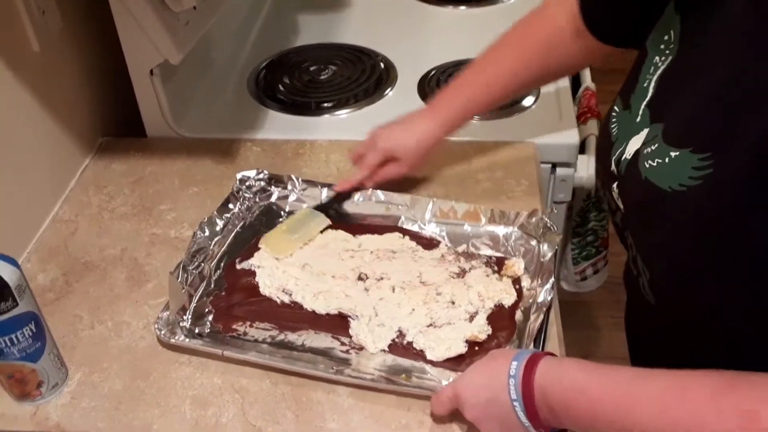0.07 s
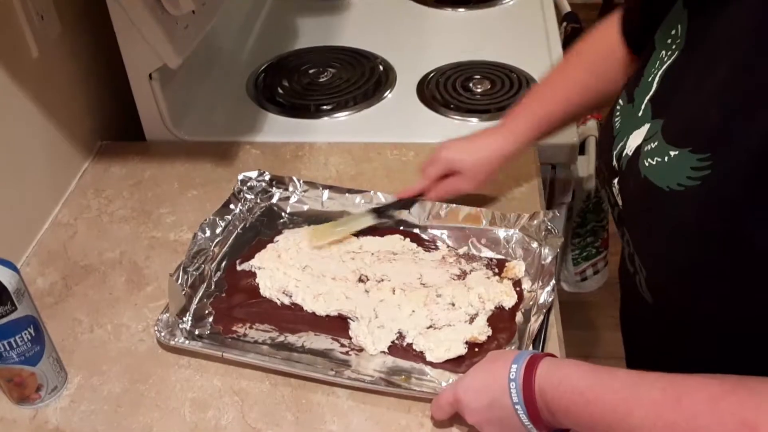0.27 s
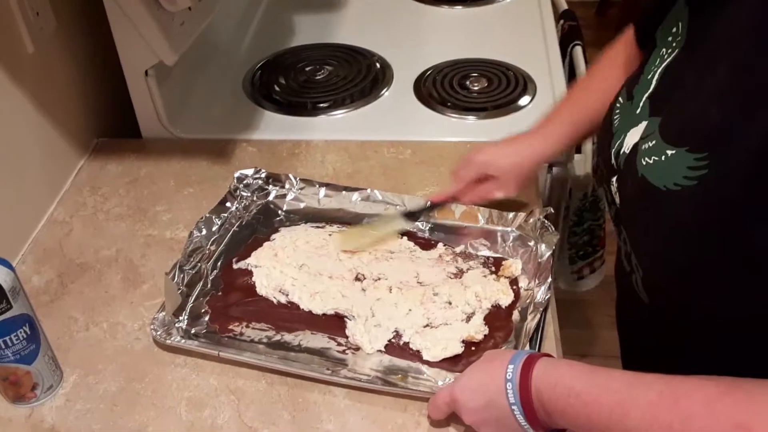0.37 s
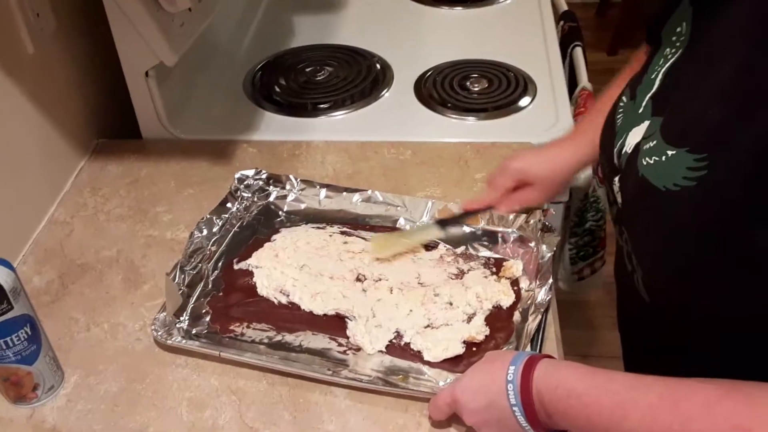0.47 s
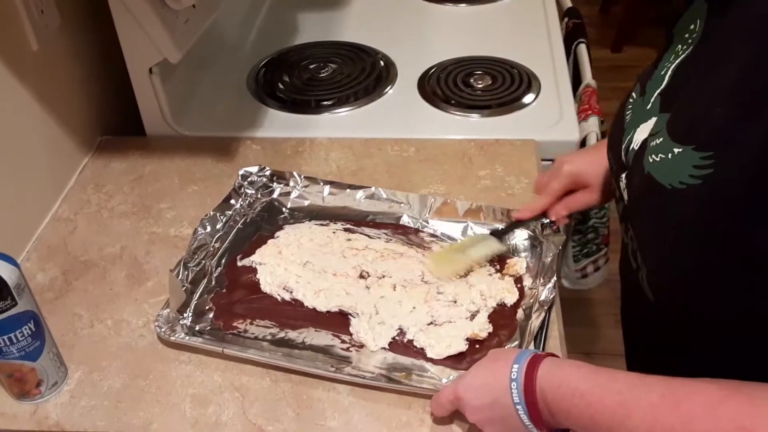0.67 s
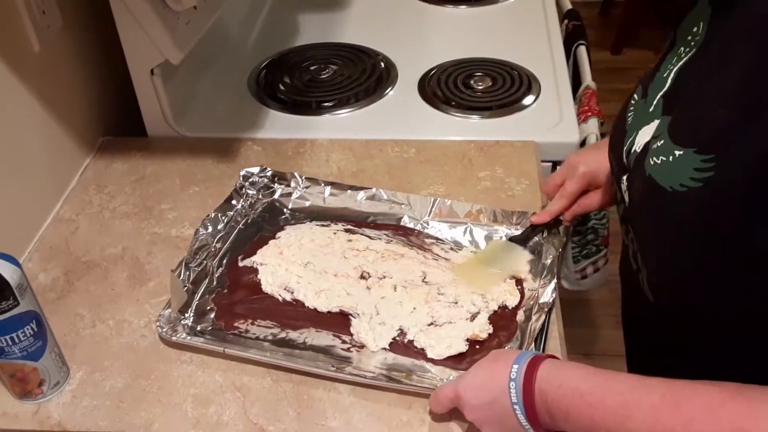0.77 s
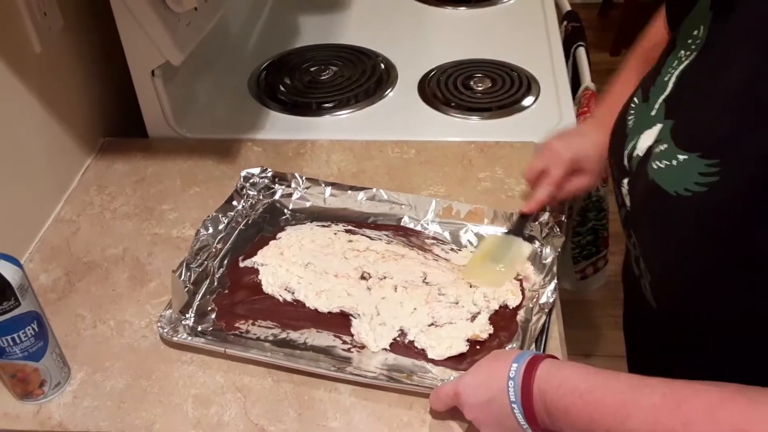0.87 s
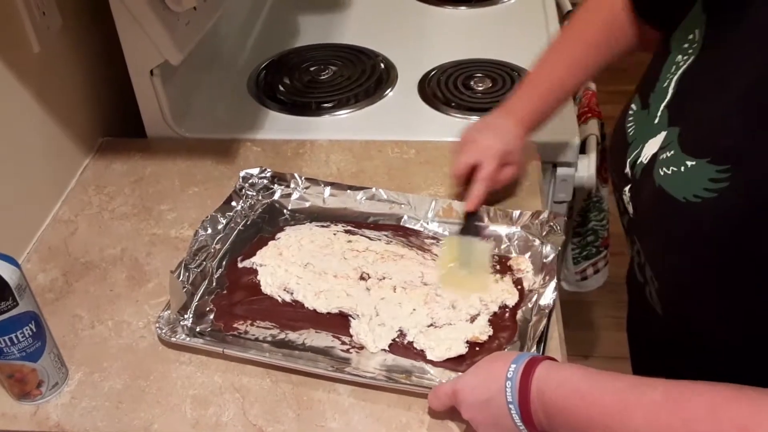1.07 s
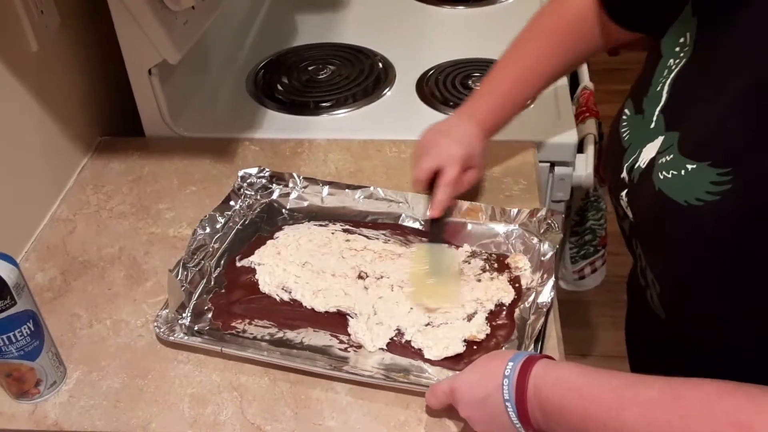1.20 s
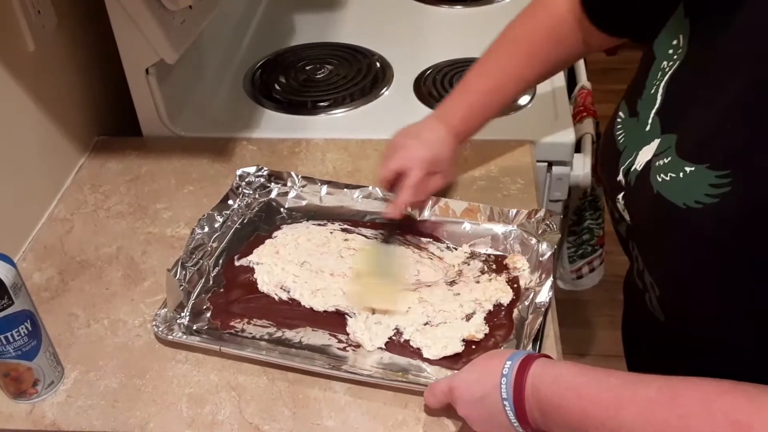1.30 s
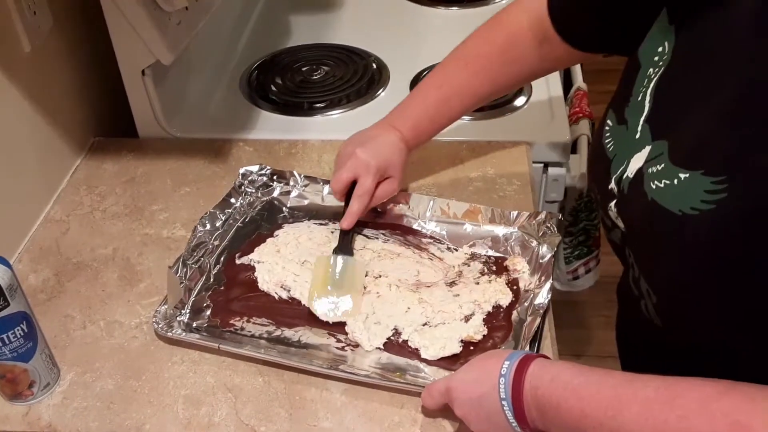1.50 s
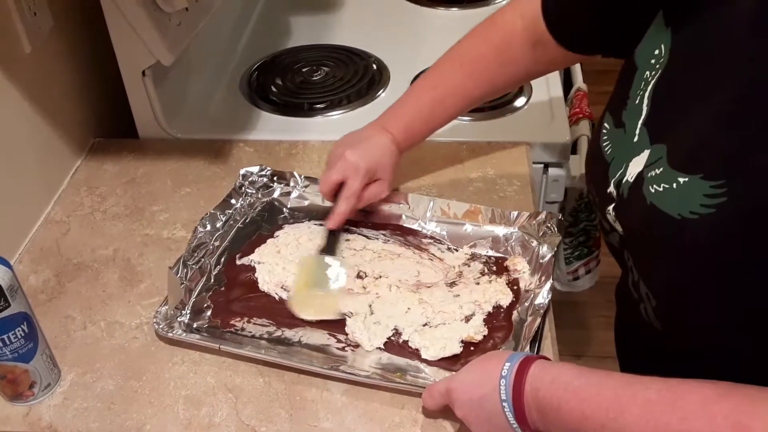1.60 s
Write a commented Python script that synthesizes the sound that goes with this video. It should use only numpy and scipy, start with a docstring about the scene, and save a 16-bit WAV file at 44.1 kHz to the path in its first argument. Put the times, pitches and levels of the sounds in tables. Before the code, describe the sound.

Thin foil crinkles and rustles in quick bursts as a spatula scrapes across a baking sheet

```python
"""A spatula drags a rustle of tiny creases out of foil as it spreads melted chocolate over a baking sheet.
The rustle is trains of random clicks, filtered into bands with ringing facets; folds buckle in bursts.
The blade also knocks the sheet, and each knock is a short noise that rings the sheet's modes.
Filtered noise and faint hums make the sheet rumble on the counter under the stroke.
A short kitchen reverberation follows foil and knocks; shaped noise gives steady hiss and room air."""
import sys
import numpy as np
from scipy import signal
from scipy.io import wavfile

SR = 44100
rng = np.random.default_rng(int(sys.argv[2]) if len(sys.argv) > 2 else 0)


def int16_out(signal):
    """Quantize to a 16-bit WAV file."""
    q = np.round(np.clip(np.atleast_2d(signal).T, -1, 1) * 32767)
    wavfile.write(sys.argv[1], SR, q.astype(np.int16))


def amplitude_ratio(level_db):
    """Convert a level in decibels to the matching linear amplitude (field) ratio."""
    exponent = np.asarray(level_db, float) / 20
    return 10 ** exponent


N = 72765  # length in samples

EDGES = 26.8 * 2 ** np.arange(0, 9.5, 1 / 3)  # third-octave band edges in Hz
FLICKER_PER_S = 17.5  # rate of the rustle's and the facets' level drifts


def rms_one(x):
    """Scale to rms 1."""
    return x / np.sqrt(np.mean(x ** 2) + 1e-20)


def in_time(rows):
    """Interpolate the columns of a time curve at every sample."""
    seconds, *columns = np.transpose(rows)
    return [np.interp(np.arange(N) / SR, seconds, column) for column in columns]


def at_hz(points, hz):
    """Read a spectrum on a logarithmic frequency axis."""
    points = np.array(points)
    return np.interp(np.log(hz), np.log(points[:, 0]), points[:, 1])


def drift(rate):
    """Slow random wander of rms 1: noise through a two-pole low-pass at the given rate per second."""
    # computed at every 40th sample; the first 500 values let the filter settle
    pole = np.exp(-80 * np.pi * rate / SR)
    noise = rng.standard_normal(N // 40 + 502)
    slow = signal.lfilter([1], [1, -2 * pole, pole * pole], noise)[500:]
    return np.interp(np.arange(N) / 40, np.arange(len(slow)), rms_one(slow))


def band(x, low, high):
    """Band-pass between two frequencies in Hz."""
    return signal.sosfilt(signal.butter(2, [low, high], "band", fs=SR, output="sos"), x)


def spread(mid, side, alike, left_db):
    """Mix mid and side into two channels of given likeness and left-minus-right balance in dB."""
    alike = np.clip(alike, -.9, .99)
    pair = np.sqrt(1 + alike) * mid + np.sqrt(1 - alike) * side * np.array([[1], [-1]])
    return pair * amplitude_ratio(np.array([[.5], [-.5]]) * left_db)


def air():
    """Steady hiss and room air: white noise shaped in third-octave bands."""
    # Colour of the air. Each row: frequency in Hz, relative level in dB per Hz.
    air_colour = [(25, -30), (70, -11), (1000, -10), (1900, -4), (3700, -7), (6000, -8), (7700, -3),
                  (9700, -6), (12200, 1.5), (15400, -4)]
    # How alike the channels are. Each row: frequency in Hz, likeness (1 is identical).
    air_likeness = [(60, .65), (300, .5), (1400, .15), (4000, 0)]
    # Stereo tilt. Each row: frequency in Hz, left minus right in dB.
    air_balance = [(60, 6), (500, 2), (5000, 3)]
    air_db = -48.5  # rms of the channel mean

    white, out = rng.standard_normal((2, 2, N)), 0
    for k, (low, high) in enumerate(zip(EDGES, EDGES[1:])):
        hz = np.sqrt(low * high)
        # neighbouring bands use different noise
        mid, side = band(white[k % 2], low, high)
        pair = spread(mid, side, at_hz(air_likeness, hz), at_hz(air_balance, hz))
        out = out + amplitude_ratio(at_hz(air_colour, hz)) * pair
    return amplitude_ratio(air_db) * out / np.std(out.mean(axis=0))


def kitchen(x):
    """Reverberation: convolution with a dull, dying noise response for each channel."""
    t60_s, wall_cut_hz = 0.15, 8100
    t = np.arange(SR // 2) / SR
    # no reflection in the first 6 ms
    tail = rng.standard_normal((2, len(t))) * amplitude_ratio(-60 * t / t60_s) * (t > .006)
    tail = signal.sosfilt(signal.butter(1, wall_cut_hz, fs=SR, output="sos"), tail)
    return signal.fftconvolve(x, tail / np.sqrt(np.sum(tail ** 2) / 2), axes=1)[:, :N]


def sheet_rumble():
    """Rubbing noise in two low resonances of the sheet on the counter, with faint wavering hums."""
    # Stroke of the rumble. Each row: time in seconds, relative level below 150 Hz in dB, level above in dB.
    rumble_levels = [(0, -61.5, -66), (.2, -56.5, -61), (.4, -64, -62.5), (.9, -64.5, -61),
                     (1.05, -72, -64), (1.15, -69, -54), (1.19, -77, -69), (1.65, -71.5, -78)]
    # Resonances. Each row: frequency in Hz, width in Hz, relative level in dB, rumble column to follow.
    resonances = [(117, 46, -9, 0), (159, 170, -7, 1)]
    # Hums. Each row: frequency in Hz, waver in Hz, relative level in dB, rumble column to follow.
    hums = [(77, 4, -1, 0), (247, 6, -1, 1)]
    # Left minus right in dB, one value for each rumble column.
    rumble_left_db = (6.5, 2.2)
    likeness, wavers_per_s = .7, 8

    levels, out = in_time(rumble_levels), 0
    for hz, width_hz, level_db, column in resonances:
        k = int(round(column))
        pole = np.exp(-np.pi * width_hz / SR)
        feedback = [1, -2 * pole * np.cos(2 * np.pi * hz / SR), pole * pole]
        mid, side = signal.lfilter([1, 0, -1], feedback, rng.standard_normal((2, N)))
        pair = spread(rms_one(mid), rms_one(side), likeness, rumble_left_db[k])
        out = out + amplitude_ratio(levels[k] + level_db) * pair
    for hz, waver_hz, level_db, column in hums:
        k = int(round(column))
        turns = np.cumsum(hz + waver_hz * drift(wavers_per_s)) / SR
        pair = spread(np.sin(2 * np.pi * turns), 0, 0, rumble_left_db[k])
        out = out + amplitude_ratio(levels[k] + level_db) * pair
    return band(out, 45, 400)


def knocks():
    """The blade knocks the sheet: a short rattling contact rings the modes near its best-excited pitch."""
    # Each row: start in seconds, relative level in dB, best-excited pitch in Hz, t60 of the contact in seconds.
    blade_knocks = [(0.0517, -28, 2350, .005), (.069, -37, 3800, .05), (0.4806, -39, 2100, .025),
                    (0.5388, -36, 1950, .012), (1.215, -33, 1150, .04), (1.581, -32, 2600, .05)]
    # Modes of the sheet. Each row: frequency in Hz, relative level in dB, t60 in seconds.
    sheet_modes = [(1310, 3, .03), (1690, 2, .02), (1845, 1, .04), (2180, 0, .016), (2490, 0, .02),
                   (2660, -1, .035), (3050, -1, .02), (3280, -13, .14), (3480, -10, .15), (3700, 4, .018)]
    reach_octaves = .5  # spread of the excited modes around the best pitch

    out, t = np.zeros((2, N)), np.arange(SR // 4) / SR
    for start_s, level_db, centre_hz, contact_s in blade_knocks:
        ring = 0
        for hz, mode_db, t60 in sheet_modes:
            excited = np.exp(-.5 * (np.log2(hz / centre_hz) / reach_octaves) ** 2)
            ring = ring + excited * amplitude_ratio(mode_db - 60 * t / t60) * np.sin(2 * np.pi * hz * t)
        shared, left, right = rng.standard_normal((3, len(t))) * amplitude_ratio(-60 * t / contact_s)
        contact = np.array([shared + left, shared + right])
        contact = contact / np.sqrt(np.sum(contact ** 2) / 2)
        knock = signal.fftconvolve(contact, ring[None], axes=1)[:, :len(t)]
        start = int(start_s * SR)
        out[:, start:start + len(t)] += amplitude_ratio(level_db) * knock[:, :N - start]
    steep = band(band(out, 1150, 4300), 1150, 4300)
    return steep * np.array([[1.0], [-1.0]])  # right channel in opposite polarity


def snaps():
    """Tiny creases: two unrelated trains of random clicks of uneven size and either sign."""
    snaps_per_s, spread_db = 14000, 2.5
    size_db = spread_db * np.minimum(rng.exponential(1, (2, N)), 4)
    sizes = amplitude_ratio(size_db) * rng.choice([-1, 1], (2, N))
    return rms_one(sizes * (rng.random((2, N)) < snaps_per_s / SR))


def creasing():
    """Creasing level in dB in the low, middle and high zones: powers of drag and buckling folds add."""
    # Drag of the blade. Each row: time in seconds, then rustle level in dB at 1.3-6.5 kHz,
    # above 6.5 kHz and at 0.35-1.3 kHz.
    drag_levels = [(0, -53.5, -47, -55.5), (.09, -39.5, -41, -59.5), (.125, -36, -33.5, -49),
                   (.39, -31.5, -34, -47.5), (.46, -45.5, -45.5, -60.5), (.555, -51, -49.5, -60),
                   (.61, -23, -23.5, -44), (.72, -37, -45, -51.5), (.8, -42, -40, -58),
                   (.92, -35.5, -40.5, -56.5), (.975, -48.5, -48.5, -52.5), (1.2, -60, -57, -61),
                   (1.38, -51.5, -53.5, -63.5), (1.53, -65, -55, -67)]
    # Buckling folds. Each row: start in seconds, peak at 1.3-6.5 kHz in dB, level above 6.5 kHz in dB,
    # level at 0.35-1.3 kHz in dB, t60 in seconds.
    buckling_folds = [(0.0492, -23, -25, -97, 0.046), (0.1135, -16.5, -28, -46, 0.1),
                      (0.165, -45, -28, -48, 0.05), (0.1802, -17, -22, -38.5, 0.036),
                      (0.2835, -29, -36, -51, 0.16), (0.3252, -15, -28.5, -46.5, 0.065),
                      (0.353, -18, -20, -43, 0.069), (0.36, -11, -21, -50, 0.037),
                      (0.3867, -23.5, -28, -50, 0.038), (0.4792, -22.5, -34, -54.5, 0.043),
                      (0.5397, -31, -42, -70, 0.075), (0.5712, -26, -37.5, -43.5, 0.1),
                      (0.585, -10.5, -50, -37, 0.17), (0.6007, -18.5, -17.5, -42, 0.019),
                      (0.6094, -29, -13, -34, 0.023), (0.624, -24, -39, -54, 0.028),
                      (0.6484, -45, -32, -67, 0.032), (0.674, -47, -30.5, -59, 0.071),
                      (0.7825, -18, -29.5, -48, 0.12), (0.8048, -20, -32, -51, 0.15),
                      (0.837, -19.5, -31, -45, 0.072), (0.851, -64, -26.5, -64, 0.035),
                      (0.859, -12.5, -28, -47.5, 0.046), (0.9006, -24, -25, -45.5, 0.034),
                      (0.981, -22, -45, -57.5, 0.2), (0.9943, -35, -29.5, -54, 0.03),
                      (1.0032, -22, -23, -58, 0.06), (1.037, -16.5, -35.5, -50.5, 0.099),
                      (1.0924, -25.5, -46.5, -62, 0.16), (1.1383, -27.5, -59, -49.5, 0.17),
                      (1.185, -29.5, -42.5, -56, 0.1), (1.2074, -24, -43, -57, 0.059),
                      (1.297, -30.5, -52.5, -57.5, 0.11), (1.447, -32.5, -54, -65, 0.062)]
    rise_share, hold_share = 0.02, 0.13  # rise and hold time as shares of t60
    crest_db = 13  # middle-zone peak over its rms

    middle, high, low = in_time(drag_levels)
    power, t = amplitude_ratio(2 * np.array([low, middle, high])), np.arange(N) / SR
    for start_s, peak_db, high_db, low_db, t60 in buckling_folds:
        rise_s = rise_share * t60
        rise = np.clip((t - start_s) / rise_s, 0, 1)
        decay_s = np.maximum(t - start_s - rise_s - hold_share * t60, 0)
        shape = rise * amplitude_ratio(-60 * decay_s / t60)
        fold_db = np.array([[low_db], [peak_db - crest_db], [high_db]])
        power = power + (amplitude_ratio(fold_db) * shape) ** 2
    return 10 * np.log10(power)


def facets(x, low, high):
    """Small flat faces of the foil ring at random pitches in the band, and each comes and goes."""
    count, sharpness_q = 7, 32
    swing_db, over_patch_db = 10, -3  # largest swing; rings relative to the patch
    rings = 0
    for hz in low * (high / low) ** rng.random(count):
        swing = amplitude_ratio(swing_db * np.tanh(drift(FLICKER_PER_S)))
        rings = rings + swing * signal.lfilter(*signal.iirpeak(hz, sharpness_q, SR), x)
    mixed = x + amplitude_ratio(over_patch_db) * rings * np.std(x) / np.std(rings)
    return mixed * np.std(x) / np.std(mixed)


def foil():
    """Snaps ring briefly in third-octave patches that follow the creasing and flicker together."""
    # Colour of the foil, evened out per zone. Each row: frequency in Hz, relative level in dB per Hz.
    foil_colour = [(210, -32), (398, -12), (664, -6.5), (804, -10.5), (1110, -7), (2630, -3.5), (4040, -4),
                   (7310, -9), (11400, -2.5), (16000, -14.5)]
    # Centres of the low, middle and high colour zones, in Hz.
    zone_centres_hz = (790, 3480, 12700)
    # How alike the channels are. Each row: frequency in Hz, likeness (1 is identical).
    foil_likeness = [(400, .7), (2000, .3), (6800, 0), (15000, -.04)]
    # Stereo tilt. Each row: frequency in Hz, left minus right in dB.
    foil_balance = [(400, 1.5), (2000, .5), (4400, 2), (8000, -2.3)]
    # Blade position, used around its mean. Each row: time in seconds, left minus right in dB.
    blade_place = [(0, 2), (.3, 2.5), (1, 3.5), (1.3, 2)]
    flicker_db = 1.58  # rms

    zones_db, trains, out = creasing(), [snaps(), snaps()], 0
    swing_db = zones_db - zones_db.mean(axis=1, keepdims=True)
    place_db, = in_time(blade_place)
    place_db = place_db - place_db.mean()
    together = flicker_db * drift(FLICKER_PER_S)
    edges = EDGES[EDGES > 300]
    widths, centres = np.diff(edges), np.sqrt(edges[1:] * edges[:-1])
    # patch powers in each zone sum to 1
    patch_db = at_hz(foil_colour, centres) + 10 * np.log10(widths)
    zone = np.searchsorted([1300, 6500], centres)
    patch_db -= 10 * np.log10(np.bincount(zone, amplitude_ratio(2 * patch_db)))[zone]
    for k, hz in enumerate(centres):
        # mean level from the patch's own zone, movement blended between neighbouring zones
        where = np.interp(np.log(hz), np.log(zone_centres_hz), [0, 1, 2])
        below = min(int(where), 1)
        blend = where - below
        swing = swing_db[below] * (1 - blend) + swing_db[below + 1] * blend
        level_db = zones_db[zone[k]].mean() + swing
        gain = amplitude_ratio(level_db + patch_db[k] + together)
        patch = band(trains[k % 2] * gain, edges[k], edges[k + 1])
        # make up the level lost to the narrow band
        mid, side = facets(patch, edges[k], edges[k + 1]) * np.sqrt(SR / 4 / widths[k])
        out = out + spread(mid, side, at_hz(foil_likeness, hz), at_hz(foil_balance, hz) + place_db)
    return out


def scene():
    """Foil and knocks with their reverberation, over the sheet's rumble and the air."""
    kitchen_db = -16
    near = foil() + knocks()
    return near + amplitude_ratio(kitchen_db) * kitchen(near) + sheet_rumble() + air()


def top_cut(x):
    """Nothing passes above 16.86 kHz."""
    return signal.sosfilt(signal.butter(12, 16860, fs=SR, output="sos"), x)


def record(dry):
    """Finish the mix: a steep elliptic low-pass removes the top of the treble."""
    cutoff_hz = 15680
    low_pass = signal.ellip(10, .5, 70, cutoff_hz, fs=SR, output="sos")
    finished = signal.sosfilt(low_pass, dry)
    return top_cut(finished)


dry = scene()
out = record(dry)
int16_out(out)
```